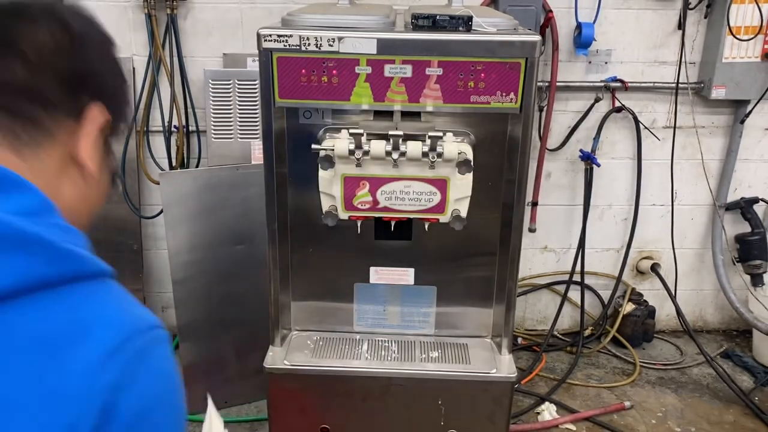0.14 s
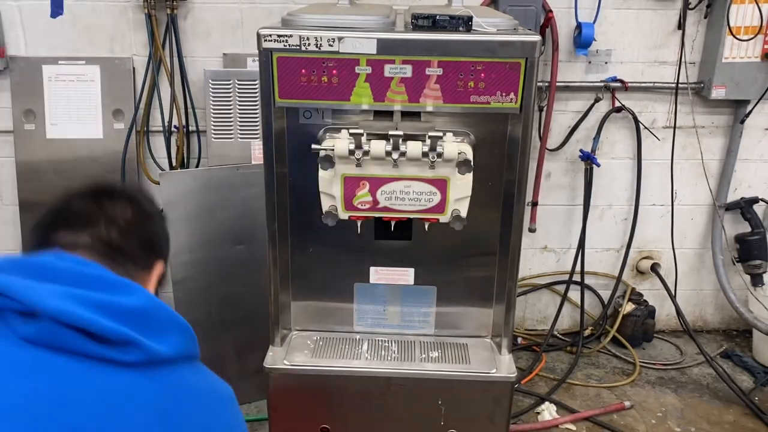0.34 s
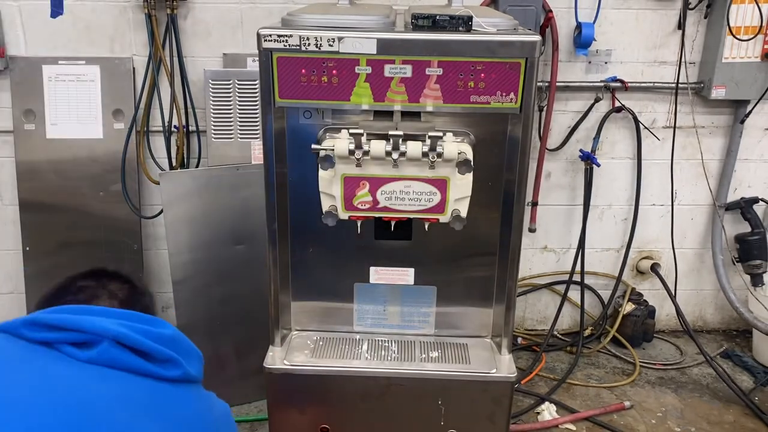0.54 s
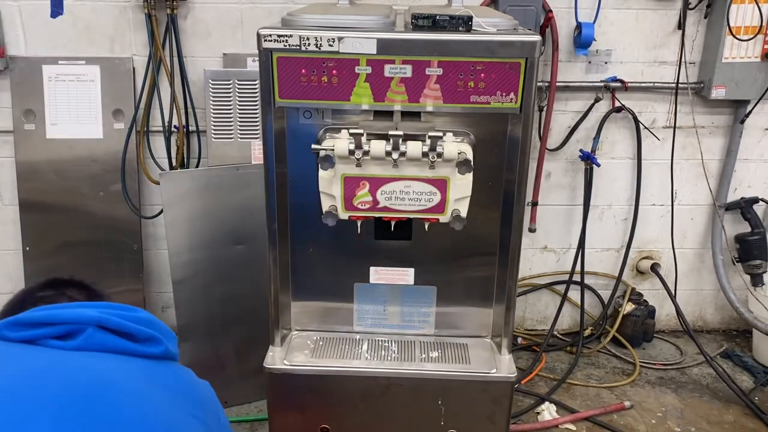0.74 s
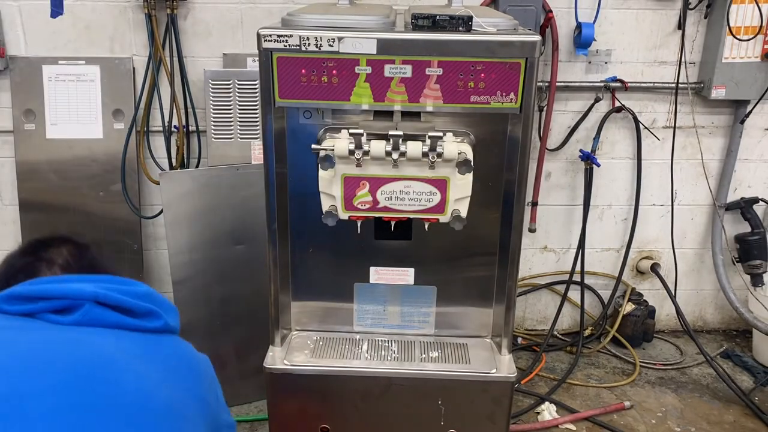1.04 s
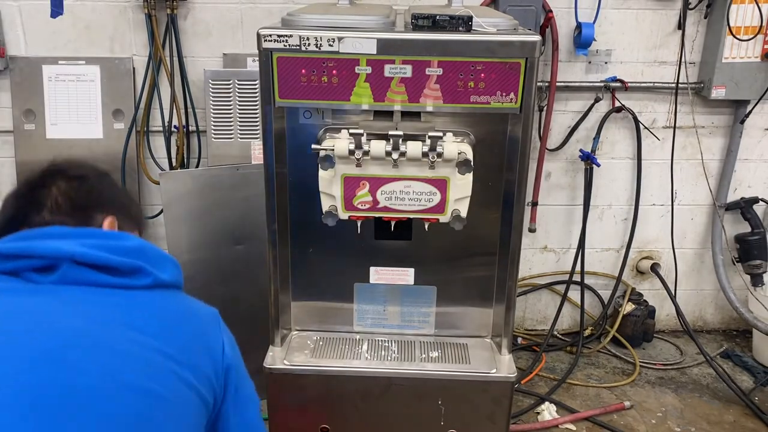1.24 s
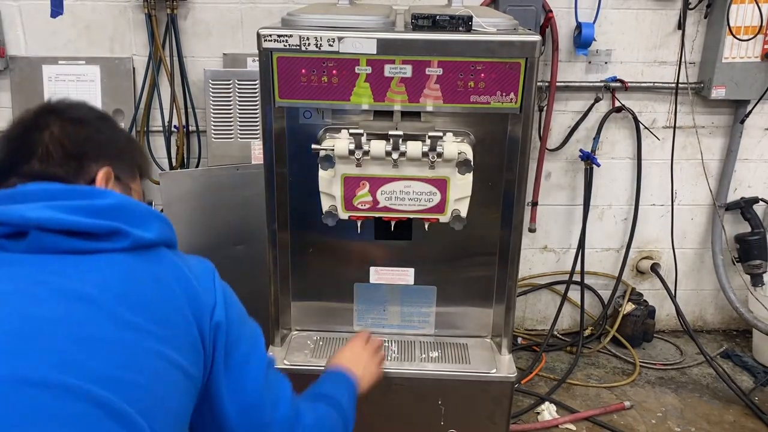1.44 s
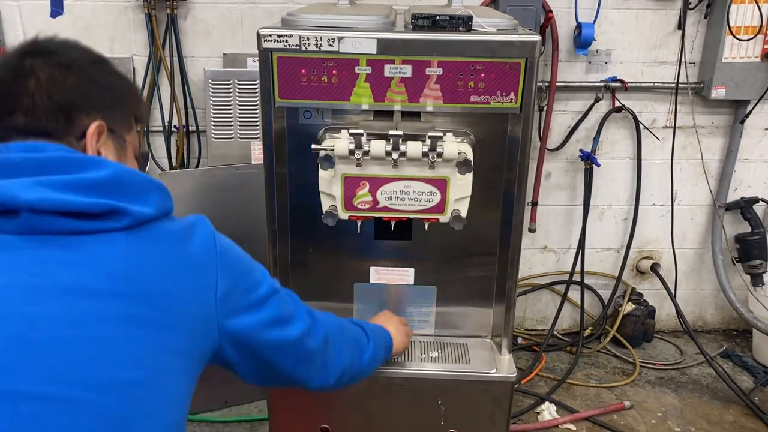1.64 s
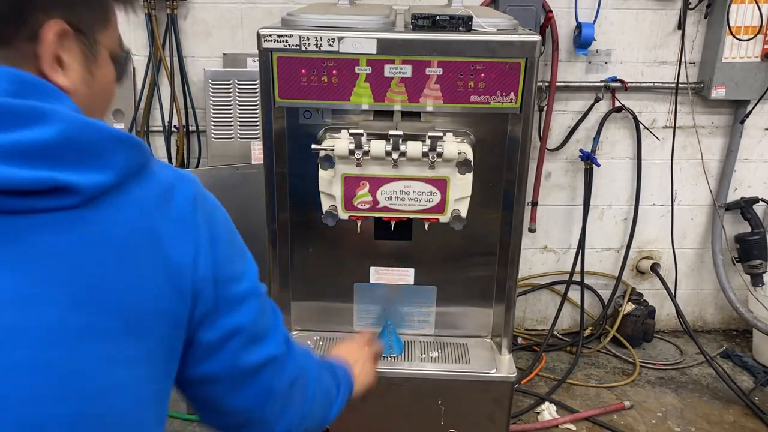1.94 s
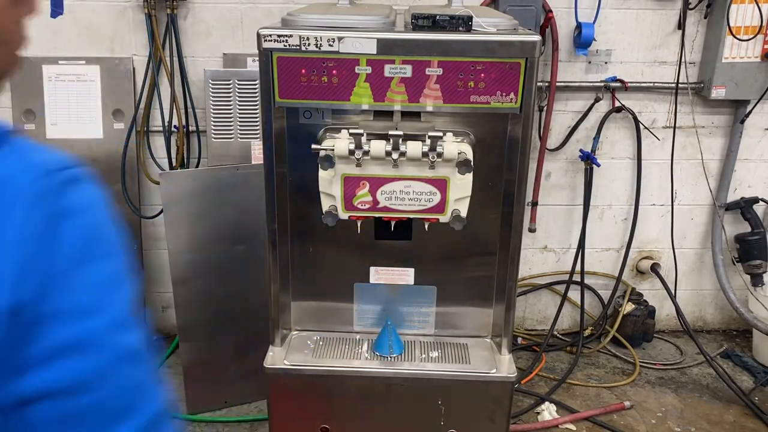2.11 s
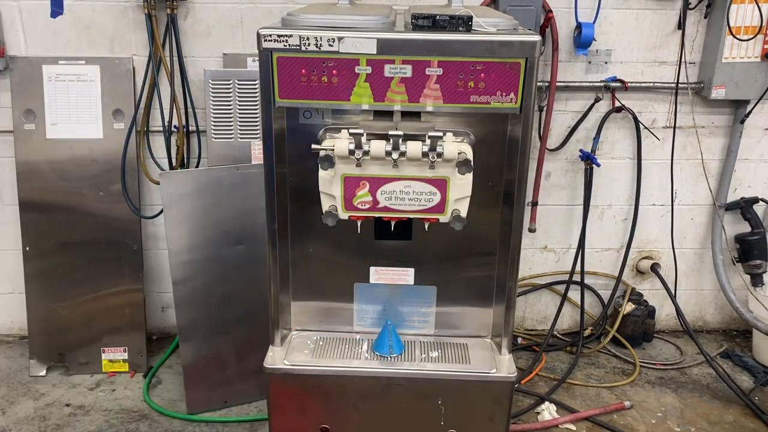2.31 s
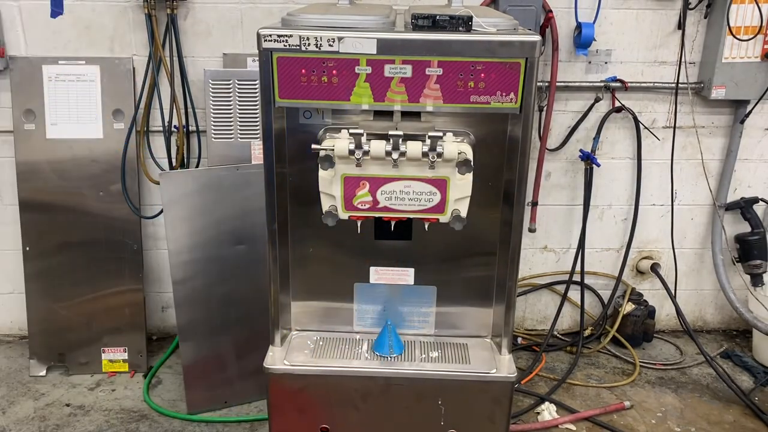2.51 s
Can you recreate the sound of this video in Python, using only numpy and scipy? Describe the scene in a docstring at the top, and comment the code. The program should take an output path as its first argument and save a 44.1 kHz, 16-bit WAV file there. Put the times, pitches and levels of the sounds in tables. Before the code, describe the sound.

Steady low machine hum with compressor buzz, some low thumps, a sharp plastic knock, a final clunk

```python
"""A soft serve machine hums in a hard-walled workshop: wavering mains overtones, led by the sixth.
Its compressor adds a comb of shaft orders just under mains speed, pulsing gas hiss and a fading whine.
Beside it a plastic funnel clacks and chatters on the steel drip tray, after three dull thumps of someone
rummaging low; at the end something hollow is set down with a clunk. These are decaying modes and noise puffs.
Behind them lie shaking panels (beating tones) and fan air (shaped noise); a noise tail is the room."""
import sys
import numpy as np
from scipy import signal
from scipy.fft import rfft, irfft, next_fast_len
from scipy.io import wavfile
from scipy.ndimage import uniform_filter1d, map_coordinates

SR = 44100
rng = np.random.default_rng(int(sys.argv[2]) if len(sys.argv) > 2 else 0)


def unload_wav(signal):
    """Save mono or channel-first audio to the path in sys.argv[1] as 16-bit WAV at rate SR, clipped to [-1, 1]."""
    wavfile.write(
        sys.argv[1],
        SR,
        np.round(np.clip(np.atleast_2d(signal).T, -1, 1) * 32767).astype(np.int16),
    )


N = 117747
T = np.arange(N) / SR  # time [s]
EARS = np.array([[1], [-1]])  # sign of an offset at left and right
SHAFT_HZ = 58.595  # compressor turns per second
TOP_HZ = 16000  # band limit

# Likeness of the two ears across the spectrum: (frequency [Hz], left-right correlation [0 to 1])
LIKENESS = [(60, 1), (150, 0.99), (300, 0.8), (600, 0.4), (1500, 0.36), (4000, 0.7), (8000, 0.17),
            (14000, 0)]


def amp(db):
    """Turns decibels into gain."""
    return 10 ** (np.asarray(db) / 20)


def unit(x):
    """Scales a signal to rms 1."""
    return x / np.sqrt(np.mean(x ** 2) + 1e-20)


def along(points, hz):
    """Reads (frequency, value) points on a log frequency axis."""
    f, v = np.transpose(points)
    return np.interp(np.log(hz + 1), np.log(f + 1), v)


def wobble(rate):
    """A smooth random curve with rate knots a second, read from a looped table of 256."""
    knots = rng.standard_normal(256)
    return map_coordinates(knots, [T * rate], mode="wrap")


def filtered(x, response):
    """Multiplies the spectrum of x by a response of frequency."""
    m = next_fast_len(N + SR // 2)
    hz = np.fft.rfftfreq(m, 1 / SR)
    return irfft(rfft(x, m) * response(hz), m)[..., :N]


def pan(db):
    """Left and right gains for a level difference, left over right."""
    return unit(amp(EARS * db / 2))


def half_angle(hz):
    """Half the angle [rad] whose cosine is the likeness of the ears."""
    return np.arccos(np.clip(along(LIKENESS, hz), -1, 1)) / 2


def spread(pair, gain=lambda hz: 1.0):
    """Mixes two unlike signals as mid and side, so the ears agree as much as LIKENESS asks."""
    def response(hz):
        angle = half_angle(hz)
        return gain(hz) * np.array([np.cos(angle), np.sin(angle)])
    mid, side = filtered(pair, response)
    return np.array([mid + side, mid - side])


def rush(spectrum, patchy_db=0):
    """Stereo noise of rms 1 shaped by a spectrum, with smooth time-frequency patches of random gain."""
    z = signal.stft(rng.standard_normal((2, N)), nperseg=512)[2]
    across_hz = uniform_filter1d(rng.standard_normal(z.shape[1:]), size=5, axis=0)
    patches = unit(uniform_filter1d(across_hz, size=16, axis=1))
    pair = signal.istft(z * amp(patchy_db * patches), nperseg=512)[1][:, :N]
    return unit(spread(pair, lambda hz: amp(along(spectrum, hz))))


def tone(hz, db, waver_db, drift):
    """A sine wavering in level and phase; its phase parts between the ears as their likeness falls."""
    apart = half_angle(hz) * rng.choice([-1, 1])
    phase = 2 * np.pi * (hz * T + rng.random()) + drift * wobble(4.22)
    level = amp(db + waver_db * wobble(6.86))
    return np.sqrt(2) * level * np.sin(phase + EARS * apart)


def burst(s, db, spectrum, t60):
    """A puff of contact noise: a sharp onset and exponential decay, thinned below the first point."""
    t = np.maximum(T - s, 0)
    envelope = amp(db - 60 * t / t60) * (1 - np.exp(-t / 0.0001))
    low_cut = signal.butter(2, spectrum[0][0], "high", fs=SR, output="sos")
    return signal.sosfilt(low_cut, envelope * rush(spectrum))


def blows(contacts, modes, spectrum, noise_t60, attack_s, pivot_hz):
    """Each contact rings the modes and puffs noise, tilted in brightness about the pivot; returns both."""
    rings, puffs = np.zeros((2, 2, N))
    for s, ring_db, noise_db, bright_db in contacts:
        t = np.maximum(T - s, 0)
        tilt = lambda hz: bright_db * np.log2(hz / pivot_hz)
        # each blow varies every mode's level [dB] and pitch [ratio]
        chance = rng.normal([0, 1], [1, 0.005], (len(modes), 2))
        ring = 0
        for (hz, db, t60), (more_db, detune) in zip(modes, chance):
            decay = amp(db + tilt(hz) + more_db - 60 * t / t60)
            ring = ring + decay * np.sin(2 * np.pi * hz * detune * t)
        rings += amp(ring_db) * ring * (1 - np.exp(-t / attack_s))
        tilted = [(hz, db + tilt(hz)) for hz, db in spectrum]
        puffs += burst(s, noise_db, tilted, noise_t60)
    return rings, puffs


def grit(s, length, db, spectrum):
    """A short swell of noise broken into uneven grains by a fast random gain."""
    swell = np.sqrt(np.abs(np.sin(np.pi * np.clip((T - s) / length, 0, 1))))
    grains_per_s, grain_spread_db = 700, 5
    grains = unit(amp(grain_spread_db * wobble(grains_per_s)))
    return amp(db) * swell * grains * rush(spectrum)


def hum():
    """Motor iron is tugged on every half cycle of the mains; overtones keep in step, the sixth strongest."""
    # Main hum, the sixth overtone: (time [s], level [dB])
    drone = [(0.0, -27.5), (0.04, -25.5), (0.22, -28), (0.43, -23), (0.58, -26), (0.8, -22.5),
             (0.85, -25.5), (1.16, -23.5), (1.33, -26), (1.48, -23), (1.69, -27.5), (1.72, -25),
             (2.16, -26), (2.22, -23.5), (2.37, -27.5), (2.6, -25)]
    # Other overtones: (nominal frequency [Hz], level [dB], left over right [dB], width [0 centred, 1 opposite])
    overtones = [(120, -41, -1, 0.045), (240, -50, -4, 0.17), (300, -49, -8, 0.21), (600, -49, -6, 0.66),
                 (720, -51, -10, 0.58), (1080, -45, 4.5, 0.94), (1200, -46, -15, 0.093),
                 (1320, -43, -13, 0.67), (1440, -39.5, 3.5, 0.43), (1560, -41.5, -5, 0.13),
                 (1800, -49.5, -2, 1), (2640, -48, 18, 0.43)]
    mains_hz = 60.0
    level_db = np.interp(T, *np.transpose(drone)) + 0.4 * wobble(16.4)
    phase = 2 * np.pi * 6 * mains_hz * T + 0.074 * wobble(7.7)
    out = pan(-0.63) * amp(level_db) * np.sin(phase + 0.12 * EARS)
    for hz, db, side_db, width in overtones:
        multiple = np.round(hz / mains_hz)
        phase = 2 * np.pi * multiple * mains_hz * T + 0.06 * wobble(4.6)
        waver_db = 1.1 * wobble(6.98)  # slow
        flutter_db = 0.8 * wobble(35)  # quick
        level = pan(side_db) * amp(db + waver_db + flutter_db)
        out = out + level * np.cos(phase + EARS * width * np.pi / 2)
    return np.sqrt(2) * out


def compressor():
    """The turning shaft gives a comb of orders, a few strong, and gas hiss pulsing three times a turn."""
    # Strong shaft orders: (nominal frequency [Hz], level [dB])
    orders = [(117, -35.5), (176, -54), (234, -50), (352, -41), (527, -48.5), (645, -51.5), (820, -65),
              (879, -49), (938, -51), (1113, -53.5), (1172, -59), (1289, -50), (1934, -52), (2168, -62),
              (2402, -60.5), (2461, -57), (2578, -53.5), (2695, -55.5)]
    # Fine buzz: (frequency [Hz], typical level of each order [dB])
    buzz_levels = [(400, -60.5), (1000, -57.5), (1700, -58), (2500, -60.5), (3300, -64), (5000, -69),
                   (7000, -65), (10000, -97), (13000, -78), (16000, -76)]
    # Colour of the gas hiss: (frequency [Hz], relative density [dB per Hz])
    hiss_colour = [(1500, -34), (3000, -2), (7000, 30), (11000, 9), (15000, -28)]
    buzz_scatter_db, hiss_db, hiss_pulse = 2.5, -52.5, 0.34

    strong = sum(tone(np.round(hz / SHAFT_HZ) * SHAFT_HZ, db, waver_db=1.5, drift=0.14) for hz, db in orders)

    # one turn of buzz as a wavetable for each ear, with its own scatter and phases
    hz = np.arange(1024) * SHAFT_HZ
    scatter_db = buzz_scatter_db * rng.standard_normal((2, len(hz)))
    phases = np.exp(2j * np.pi * rng.random((2, len(hz))))
    lines = amp(along(buzz_levels, hz) + scatter_db) * phases
    size = 8192
    cycle = irfft(lines * (hz > 0) * (hz < TOP_HZ), size) * size / np.sqrt(2)
    turns = SHAFT_HZ * T + 0.0018 * wobble(4.9)
    buzz = np.array([np.interp(turns % 1 * size, np.arange(size), ear) for ear in cycle])

    pulses = 1 + hiss_pulse * np.cos(2 * np.pi * 3 * turns)
    hiss = amp(hiss_db) * unit(pulses * rush(hiss_colour))
    return strong + buzz + hiss


def whine():
    """One thin, high shaft order stands out at first, then sinks into the buzz."""
    # Fading whine: (time [s], level [dB])
    fade = [(0, -56), (.7, -57.5), (1.2, -63), (2.6, -70)]
    order = 101
    level_db = np.interp(T, *np.transpose(fade))
    return tone(order * SHAFT_HZ, level_db, waver_db=1.0, drift=0.33)


def funnel():
    """Hard plastic clacks on steel, ringing the tray's modes; its rim rattles as it settles."""
    # Contacts: (time [s], ring level [dB], crack level [dB], brightness [dB per octave])
    knocks = [(1.5703, -17, -16, 2), (1.5714, -8.5, -14.5, 2), (1.581, -34, -19, -1.5),
              (1.592, -16, -17.5, -3.5)]
    # Ringing of the tray: (frequency [Hz], relative level [dB], t60 [s])
    tray_modes = [(273.6, -8, 0.17), (477, -18, 0.075), (870, 1, 0.036), (1130, -5, 0.036),
                  (1380, -7, 0.03), (1870, 0.5, 0.024), (2040, -4, 0.02), (2970, -9, 0.025),
                  (3450, -7, 0.017), (4010, -5.5, 0.024)]
    # Colour of crack and chatter: (frequency [Hz], relative density [dB per Hz])
    crack_colour = [(150, -17), (450, -2.5), (850, 0.5), (1300, 4), (1900, 1), (2600, -4.5), (4000, -8),
                    (5300, -10), (7000, -12.5), (11000, -14.5), (15500, -20)]
    ring, crack = blows(knocks, tray_modes, crack_colour, noise_t60=0.068, attack_s=0.0005, pivot_hz=1210)
    chatter = grit(1.584, length=0.023, db=-22, spectrum=crack_colour)
    ringing = room(pan(0.87) * ring, wet_db=-9)
    # the crack carries furthest into the room
    return ringing + room(pan(0.58) * (crack + chatter), wet_db=-1.5)


def thumps():
    """Dull bumps low down ring short bass modes, with rattles and gritty scuffs among them."""
    # Contacts: (time [s], body level [dB], rattle level [dB], brightness [dB per octave])
    bumps = [(.568, -12, -26, -10.5), (.582, -17.5, -48, -9), (.594, -21, -52, -10), (.782, -35, -23.5, -3),
             (.796, -12.5, -34, -3), (.828, -16.5, -33, -3), (1.0145, -15.5, -17, -1.5),
             (1.0195, -19.5, -30, 6.5), (1.033, -19, -50, -4), (1.046, -19, -43, -9)]
    # Dull body: (frequency [Hz], relative level [dB], t60 [s])
    body_modes = [(194, -3, 0.066), (226.3, -1, 0.075), (277, -9.5, 0.065), (452, -1, 0.05)]
    # Colour of the rattle: (frequency [Hz], relative density [dB per Hz])
    rattle_colour = [(200, -20), (450, -3), (650, -10), (900, 9.5), (1100, 8.5), (1400, 1.5), (1800, -2),
                     (2200, -8), (2800, -12), (3500, -20), (5000, -30), (15000, -42)]
    # Scuffs: (time [s], length [s], level [dB])
    scuff_times = [(0.779, 0.013, -22.5), (0.79, 0.013, -30.5), (0.836, 0.027, -32)]
    # Colour of the scuffs: (frequency [Hz], relative density [dB per Hz])
    scuff_colour = [(400, -12), (700, 6), (980, 10), (1300, -21), (2100, -2.5), (2600, -11), (3000, -7),
                    (3500, -10), (4100, -18), (12000, -33)]
    body, rattle = blows(bumps, body_modes, rattle_colour, noise_t60=0.057, attack_s=0.001, pivot_hz=212)
    scuffs = sum(grit(s, length, db, scuff_colour) for s, length, db in scuff_times)
    return room(pan(-3.1) * body, wet_db=-5.5) + room(pan(-1.7) * (rattle + scuffs), wet_db=-4.5)


def clunk():
    """A light touch, then a hollow blow that rings the object's modes and puffs noise."""
    # Contacts: (time [s], ring level [dB], noise level [dB], brightness [dB per octave])
    contacts = [(2.6395, -10, -13.5, 4), (2.6465, -13.5, -18.5, -10.5)]
    # Hollow ring: (frequency [Hz], relative level [dB], t60 [s])
    hollow_modes = [(205, -15, 0.23), (330, -4.5, 0.065), (428, 3.5, 0.072), (534, -1, 0.042),
                    (575, 3, 0.04), (1445, -14.5, 0.055), (1790, -19, 0.037), (2450, -27.5, 0.15)]
    # Colour of the blow's noise: (frequency [Hz], relative density [dB per Hz])
    noise_colour = [(220, -4), (550, 14.5), (800, 9), (1150, 2), (1600, -1), (2100, -15.5), (3700, -14.5),
                    (6000, -30), (15000, -50)]
    # Colour of the first touch: (frequency [Hz], relative density [dB per Hz])
    touch_colour = [(500, -10), (3000, -10), (7500, 1), (11000, 3), (16000, -6)]
    ring, puff = blows(contacts, hollow_modes, noise_colour, noise_t60=0.079, attack_s=0.0025, pivot_hz=448)
    touch = burst(2.638, -17, touch_colour, t60=0.011)
    return room(ring, wet_db=-6.5) + room(puff + touch, wet_db=-3.5)


def fan():
    """Rushing air is patchy shaped noise; panels shake at rates that beat against each other."""
    # Shaking panels and fan tones: (frequency [Hz], level [dB])
    panels = [(65, -50.5), (100, -58), (105.7, -37.5), (135, -48), (149.4, -37.5), (158.5, -40.5),
              (330, -46.5), (1034, -51)]
    # Colour of the fan air: (frequency [Hz], relative density [dB per Hz])
    air_colour = [(20, -28), (40, -21.5), (62, -20), (85, -9), (112, -2), (155, -2), (200, -14),
                  (235, -14.5), (270, -12.5), (400, -19), (490, -14.5), (700, -23.5), (950, -20),
                  (1450, -21), (1750, -27.5), (2400, -26.5), (2680, -24.5), (2950, -31), (3400, -28),
                  (4100, -36), (4800, -30.5), (5500, -42), (7000, -74), (11000, -33), (15500, -68)]
    shake = sum(tone(hz, db, waver_db=2.5, drift=0.19) for hz, db in panels)
    air = amp(-31.5) * rush(air_colour, patchy_db=2.23)
    return pan(0.83) * (shake + air)


def room(x, wet_db):
    """Adds the workshop's answer, a noise tail in which each frequency dies at its own speed."""
    # Ring of the workshop: (frequency [Hz], t60 [s])
    decay_times = [(150, 0.47), (800, 0.46), (3000, 0.47), (6000, 0.35), (12000, 0.22)]
    hz, t, z = signal.stft(rng.standard_normal((2, SR // 2)), SR, nperseg=256)
    decay = amp(-60 * t / along(decay_times, hz)[:, None])
    tail = signal.istft(z * decay, SR, nperseg=256)[1]
    tail = tail * (1 - np.exp(-np.arange(tail.shape[1]) / SR / 0.0046))  # soft build-up
    tail = tail / np.linalg.norm(tail[0])
    pair = signal.fftconvolve(x.mean(0)[None], tail, axes=1)[:, :N]
    return x + amp(wet_db) * spread(pair)


def scene():
    """The running machine and the handling beside it."""
    machine = hum() + compressor() + whine()
    handling = funnel() + thumps() + clunk()
    return machine + handling + fan()


def record(dry):
    """The recorder thins the deepest bass and keeps nothing above its band limit."""
    low_cut = signal.butter(2, 55, "high", fs=SR, output="sos")
    thin = signal.sosfilt(low_cut, dry)
    return filtered(thin, lambda hz: hz < TOP_HZ)


dry = scene()
out = record(dry)
unload_wav(out)
```